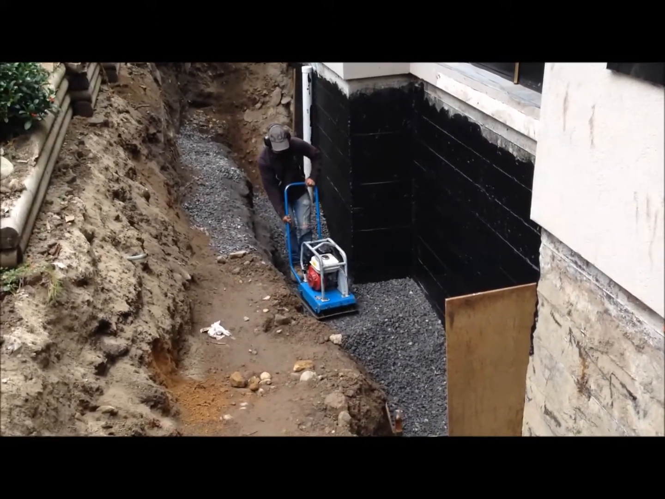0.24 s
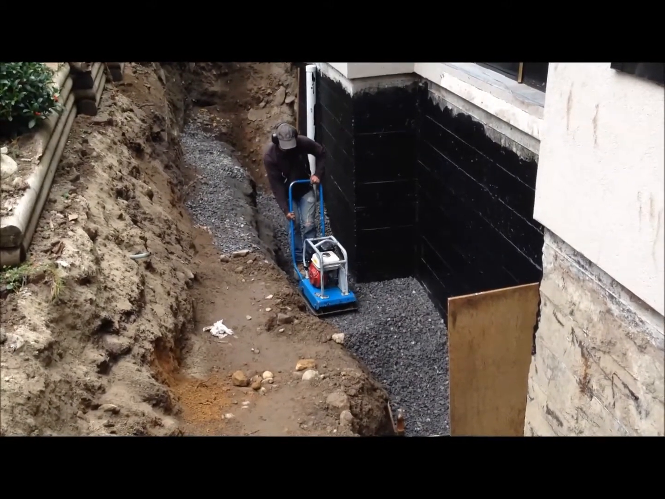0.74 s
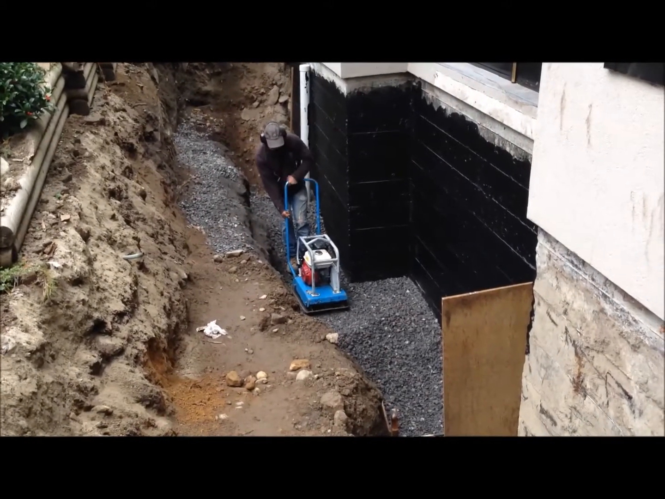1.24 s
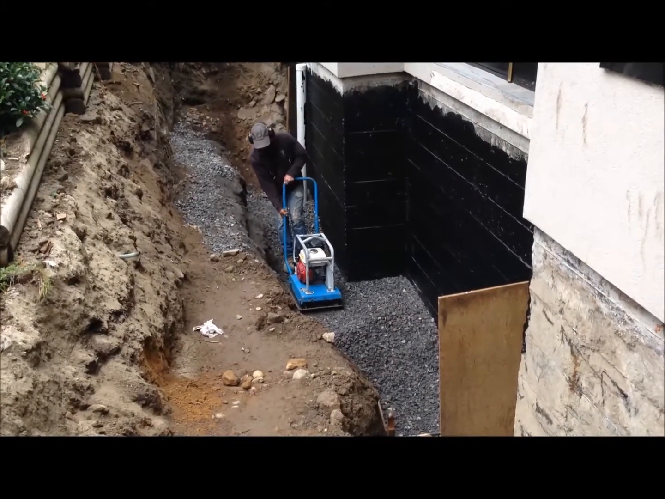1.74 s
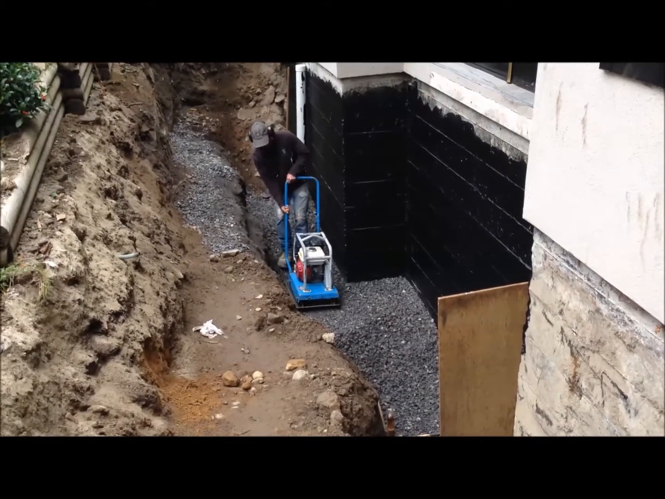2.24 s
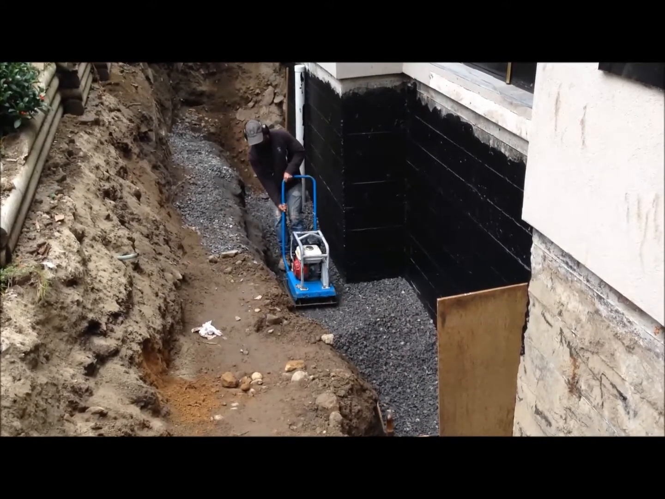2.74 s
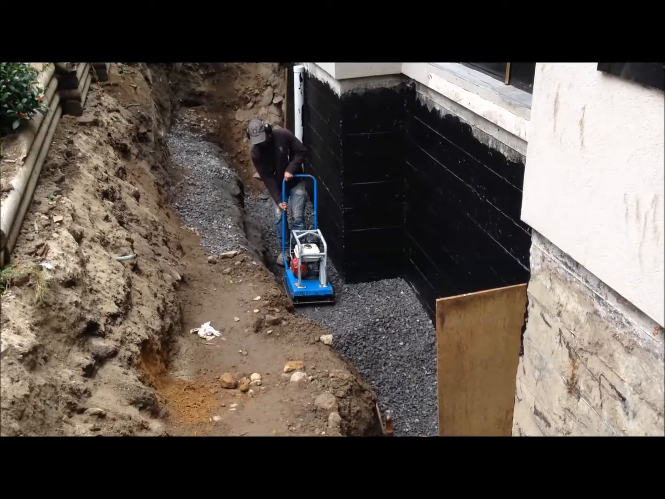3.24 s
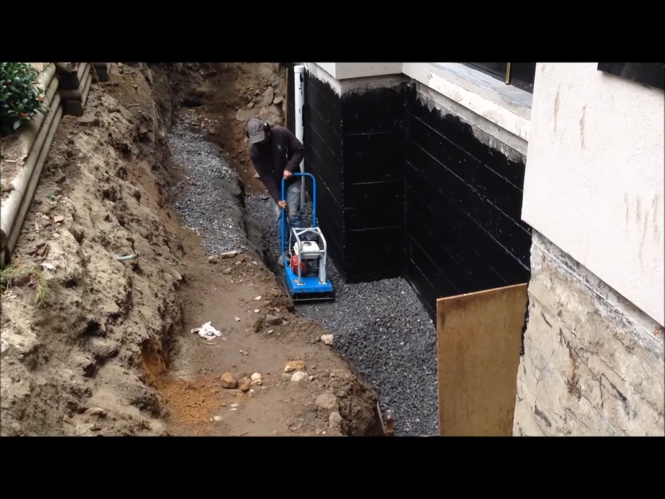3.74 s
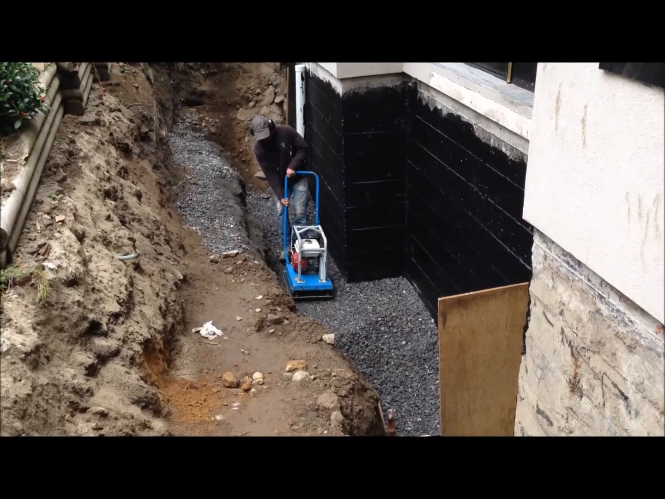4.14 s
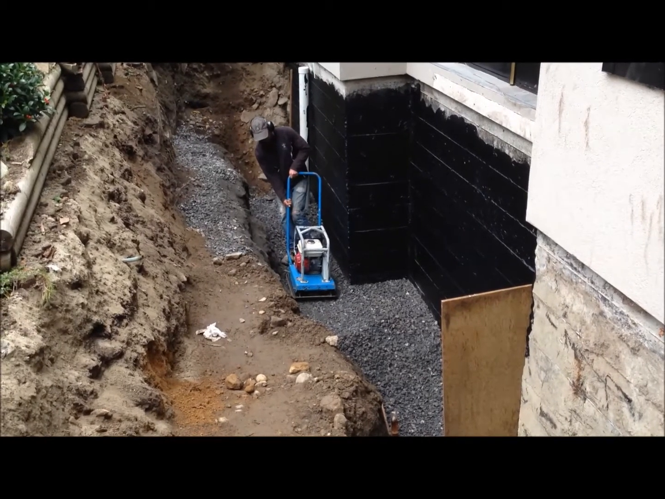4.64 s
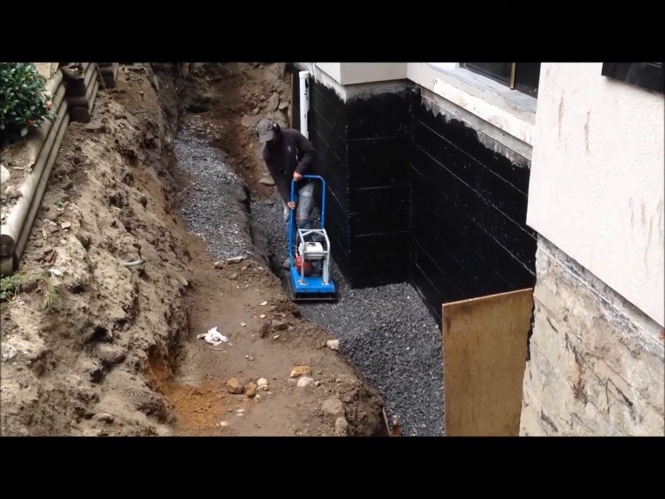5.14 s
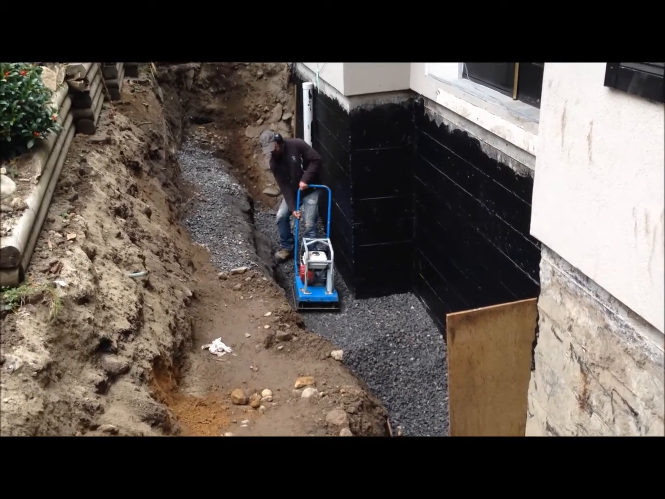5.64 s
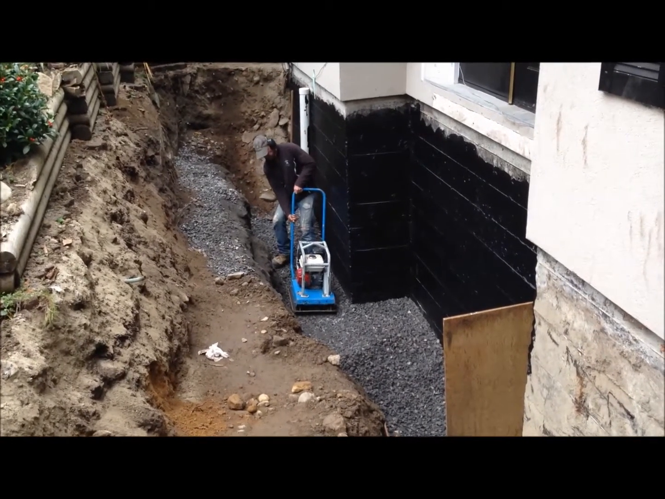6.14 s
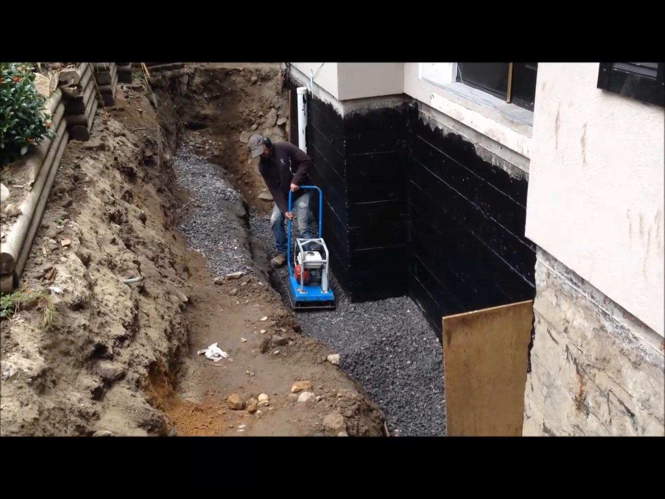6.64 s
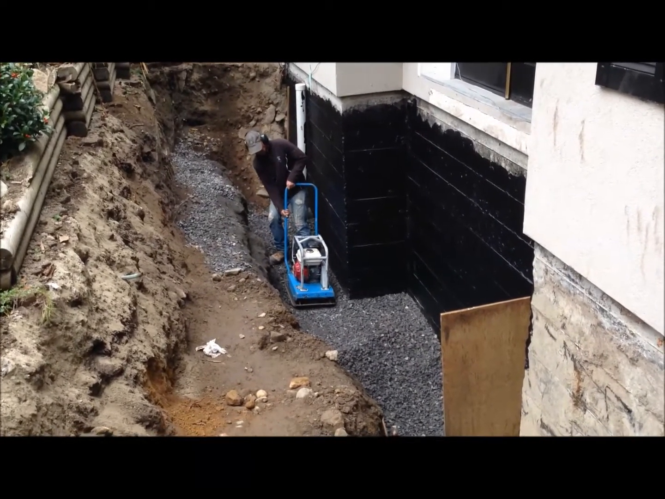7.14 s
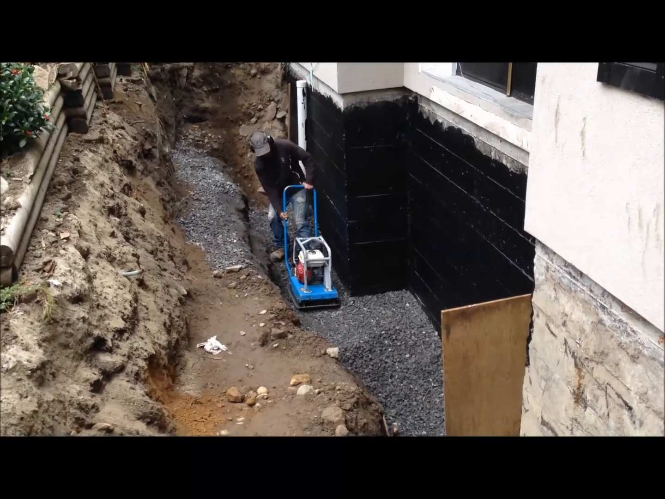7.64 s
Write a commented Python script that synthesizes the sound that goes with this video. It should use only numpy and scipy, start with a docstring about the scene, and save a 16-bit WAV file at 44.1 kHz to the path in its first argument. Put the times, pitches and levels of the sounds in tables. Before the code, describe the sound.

Loud low vibrating drone of a small-engined soil compactor in a trench, with uneven ground thumps, grinding stones and rattling steel parts.

```python
"""In a trench beside a house wall, a petrol plate compactor works crushed rock a few metres below the microphone.
Its one-cylinder four-stroke gives a harmonic exhaust note, knocks through a noisy block, and whines of fan and gears.
A belt spins the eccentric weight: a drone at its turn rate, swollen by random hard landings that thump the ground.
Bursts of filtered noise make the grinding stones; resonators ring the steel plate and the buzzing loose parts.
Short reflections off wall and earth follow the engine clatter and the stones."""
import sys
import numpy as np
from scipy import signal
from scipy.fft import rfft, irfft
from scipy.io import wavfile
from scipy.ndimage import uniform_filter1d, minimum_filter1d

SR = 44100
rng = np.random.default_rng(int(sys.argv[2]) if len(sys.argv) > 2 else 0)


def generate_wav(signal):
    """Clip the signal to [-1, 1] and save it as 16-bit WAV at the path in sys.argv[1]."""
    frames = np.transpose(np.atleast_2d(signal))
    scaled = np.clip(frames, -1, 1) * 32767
    pcm = np.round(scaled).astype(np.int16)
    wavfile.write(sys.argv[1], SR, pcm)


N = 347508
T = np.arange(N) / SR  # time of each sample, s

# Governed speed of the eccentric, sagging a little under load: time_s, turn_rate_hz
ECCENTRIC_SPEED = [(0.0, 110.2), (0.41, 110.7), (0.92, 109.2), (1.43, 109.9), (1.63, 109.9), (1.84, 110.8),
                   (2.14, 110.4), (2.35, 109.5), (3.57, 110.0), (4.9, 110.7), (5.2, 109.5), (5.82, 111.0),
                   (6.12, 111.0), (7.04, 109.9), (7.24, 110.1), (7.88, 109.5)]
# Rings of the loose parts, by part name: pitch_hz, width_hz, level_db between buzzes
LOOSE_PART_RINGS = {"handle": (1945, 28, -48.5), "frame": (2860, 38, -44), "guard": (3630, 57, -39),
                    "tank": (4763, 30, -44)}
# Exhaust note: multiple of the firing rate, level_db before the exhaust trim
EXHAUST_PARTIALS = [(1, -44), (2, -35.5), (3, -38), (4, -56), (5, -30.5), (6, -37), (7, -54), (8, -58.5),
                    (9, -40), (10, -51), (11, -38), (12, -43.5), (13, -50.5), (15, -43.5), (16, -51.5),
                    (17, -49), (18, -48.5), (20, -48.5), (21, -43.5), (23, -45)]
# Whines of the fan and of the timing gears: multiple of the firing rate, relative_level_db
FAN_PARTIALS = [(32, 2), (33, 0), (34, 3.5)]
GEAR_PARTIALS = [(38, 2.5), (40, 0), (43, 0), (62, -9.5), (66, -7)]
# Weak overtones of the plate: multiple of its turn rate, level_db relative to the drone
PLATE_OVERTONES = [(.5, -24), (1.5, -23), (3, -32), (4, -36.5), (5, -36.5), (6, -51.5)]
# Knocks of piston and valves: share of the engine cycle, relative_level_db
ENGINE_KNOCKS = [(0, -13.5), (.14, -7.5), (.42, -12), (.62, -9.5), (.78, -15)]
# Ringing of the steel plate: pitch_hz, width_hz, relative_level_db
STEEL_MODES = [(1030, 66, -6), (1374, 42, -5.5), (2087, 28, 4.5), (2648, 22, 5), (2923, 38, 0),
               (3190, 35, -2.5), (4180, 230, -7.5), (4470, 110, -6.5), (5430, 35, -4.5), (6270, 150, -8.5),
               (8240, 41, -12)]

# Colours of the ground thump, plate body, engine block, scraping stones and grit: frequency_hz, gain_db
THUMP_COLOUR = [(12, -10), (24, -14), (36, 6), (48, -5), (80, 2.5), (105, -2), (130, -1), (150, -8.5),
                (200, -14), (400, -43.5)]
BODY_COLOUR = [(120, -14.5), (170, -2.5), (200, 1), (255, 5), (300, 1.5), (410, -12), (490, 1.5),
               (560, -4.5), (630, -10), (710, -4.5), (900, -11), (2000, -31.5)]
BLOCK_COLOUR = [(300, -16.5), (600, 5), (880, -18.5), (1050, 6.5), (1400, 5.5), (1650, 0), (2400, 0.5),
                (4000, -7.5), (7000, -5), (15000, -30)]
SCRAPE_COLOUR = [(500, -13), (1100, 1), (1700, 0), (2600, 1), (3350, -3.5), (4300, -5), (5500, -7),
                 (8000, -17), (15000, -26)]
GRIT_COLOUR = [(1500, -7.5), (3500, 1), (5000, 1), (6800, 1), (8300, -2.5), (10000, -4), (12500, -11),
               (15200, -16.5)]

# The plate settles and stops bouncing for a moment: start_s, length_s, bounce_change_db
SETTLING_SPELLS = [(0.68, 0.11, -7), (1.04, 0.12, -3), (1.35, 0.45, -2), (2.19, 0.54, -7.5),
                   (2.69, 0.43, -3.5), (3.12, 0.25, -10), (3.56, 0.13, -7), (5.08, 0.11, -10),
                   (5.33, 0.12, -7), (6.88, 0.19, -11), (7.55, 0.11, -8)]
# The plate lies flat and slaps at twice its turn rate: start_s, length_s, slap_rise_db
FLAT_PLATE_SPELLS = [(0.12, 0.69, 12), (1.68, 0.68, 10.5), (3.05, 0.85, 6), (4.5, 0.56, 4.5),
                     (6.15, 0.71, 4)]
# The rocking catches the mode of the base: start_s, length_s, ring_rise_db
BASE_RING_SPELLS = [(2.3, 1.25, 5), (4.0, 1.044, 4), (4.3, 0.2, 7), (5.38, 0.13, 9), (5.95, 0.44, 8)]
# A loose part starts to buzz: start_s, length_s, part name, rise_db
PART_BUZZES = [(0.136, 0.93, "handle", 13.5), (0.445, 0.5, "frame", 1), (1.388, 0.15, "handle", 11),
               (1.68, 0.27, "frame", 11), (1.8, 0.33, "guard", 6.5), (2.6, 2.6, "tank", 5),
               (2.8, 1.0, "frame", 5), (2.85, 0.78, "handle", 8.5), (5.4, 0.56, "frame", 6),
               (5.95, 0.64, "guard", 5), (7.15, 0.6, "guard", 3.5)]
# The whines of fan and gears swell: start_s, length_s, rise_db
FAN_WHINE_SWELLS = [(3.72, 0.75, 4.3), (4.5, 0.8, 1.5), (6.47, 0.8, 6)]
GEAR_WHINE_SWELLS = [(0.0, 0.2, 4), (1.2, 1.26, 2.5), (2.8, 0.9, 3.5)]
# Ramp length of these spells, s
SETTLE_EDGE_S, FLAT_EDGE_S, BASE_EDGE_S, BUZZ_EDGE_S, WHINE_EDGE_S = 0.098, 0.21, 0.12, 0.098, 0.13

BELT = 3.511  # turns of the eccentric to one firing
TOP_HZ = 15100  # top of the recorder's range
# Levels at the start, before any spell; drone and grit grow as the bed of stones firms up
DRONE_DB, BOUNCE_DB, SLAP_DB, BASE_DB = -11.5, -23, -38, -39
RATTLE_DB, GRIT_DB, STEEL_WAVER_DB = -25.5, -29.0, 2.0
DRONE_DB_PER_S, GRIT_DB_PER_S = 0.31, 0.4258
DRONE_PER_BOUNCE = 0.19  # dB of drone for each dB of bouncing
# On a firmer bed the plate rocks more, and less while it lies flat (dB for each dB of slap)
ROCK_DB, ROCK_DB_PER_S, ROCK_PER_SLAP = -33.5, 0.27, -0.18
# The engine's exhaust, clatter and fan slowly recede
EXHAUST_DB, EXHAUST_DB_PER_S = 0.5, -0.12
CLATTER_DB, CLATTER_DB_PER_S = -29.6, -0.35
FAN_DB, FAN_DB_PER_S, GEAR_DB = -35.5, -0.84, -35.0


def undb(db):
    """Decibels to gain."""
    return 10 ** (np.asarray(db) / 20)


def level(x, db):
    """Bring the rms to 0 dB, then apply a fixed level or a level curve in dB."""
    return x * undb(db) / np.sqrt(np.mean(x ** 2))


def curves(table):
    """Interpolate a (time_s, value) table to one value a sample."""
    return np.interp(T, *np.transpose(table))


def spells(rows, edge_s):
    """Level change in dB from (start, length, dB) spells, each ramping in, holding and ramping out."""
    total_db = 0
    for start, length, db in rows:
        inside_s = np.minimum(T - start, start + length - T)
        total_db = total_db + db * np.clip(inside_s / edge_s + .5, 0, 1)
    return total_db


def walk(rate):
    """Smooth random drift with a spread near 1, from random steps at this rate in Hz."""
    k = int(SR / rate)
    steps = np.repeat(rng.standard_normal(N // k + 1), k)
    return 1.5 * uniform_filter1d(uniform_filter1d(steps, k), k)[:N]


def colour(x, points, size=8192):
    """Causal, minimum-phase filter through (Hz, dB) points."""
    hz, db = np.transpose(points)
    f = np.maximum(np.arange(size // 2 + 1) * SR / size, 1)
    gain_db = np.interp(np.log(f), np.log(hz), db)
    # fold the cepstrum forward in time so that the response never precedes its cause
    cepstrum = irfft(np.log(undb(gain_db)))
    cepstrum[1:size // 2] *= 2
    cepstrum[size // 2 + 1:] = 0
    response = irfft(np.exp(rfft(cepstrum)))
    return signal.fftconvolve(x, response)[:N]


def ring(x, modes):
    """A bank of (Hz, width, dB) resonances."""
    out = 0
    for hz, width, db in modes:
        b, a = signal.iirpeak(hz, hz / width, fs=SR)
        out = out + undb(db) * signal.lfilter(b, a, x)
    return out


def blows(phase, scatter_db):
    """One click of random size at each wrap of the phase."""
    at = np.flatnonzero(np.diff(np.floor(phase)) > 0)
    out = np.zeros(N)
    out[at] = undb(scatter_db * rng.standard_normal(len(at)))
    return out


def fade(x, seconds):
    """Give each click an exponential tail with this time constant."""
    return signal.lfilter([1], [1, -np.exp(-1 / (seconds * SR))], x)


def tone(phase, db, waver_db, slip, rate):
    """A partial that wavers in level and slips in phase (radians)."""
    waver = undb(waver_db * walk(rate))
    wave = np.sin(2 * np.pi * phase + slip * walk(rate))
    return level(waver * wave, db)


def trench(x, wet_db, t60):
    """Short scattered reflections off the house wall and the earth bank, as a decaying noise tail."""
    age = np.arange(SR // 2) / SR
    decay = np.exp(-np.log(1000) * age / t60)
    tail = rng.standard_normal(len(age)) * decay * (age > .005)
    reflections = signal.fftconvolve(x, tail / np.linalg.norm(tail))[:N]
    return x + undb(wet_db) * reflections


def loose_parts(turn):
    """Loose parts are jolted on every turn; each rings at its own pitch, louder while it buzzes."""
    out = 0
    for part, (hz, width, db) in LOOSE_PART_RINGS.items():
        rows = [(start, length, rise) for start, length, name, rise in PART_BUZZES if name == part]
        buzz_db = spells(rows, BUZZ_EDGE_S)
        jolts = fade(blows(turn, scatter_db=1.5), seconds=0.0019) * rng.standard_normal(N)
        out = out + level(ring(jolts, [(hz, width, 0)]), db + buzz_db)
    return out


def whine(cycle, orders):
    """Rough lines on the engine speed; each swells and fades as the machine moves between the walls."""
    out = 0
    for k, db in orders:
        rough_phase = round(k) * cycle + 0.056 * walk(24)
        out = out + tone(rough_phase, db, waver_db=1.5, slip=0.7, rate=6)
    return out


def exhaust(cycle):
    """Pressure pulses of the firing, as wavering harmonics of the firing rate."""
    note = sum(tone(round(k) * cycle, db, waver_db=1.76, slip=0.31, rate=8) for k, db in EXHAUST_PARTIALS)
    return undb(EXHAUST_DB + EXHAUST_DB_PER_S * T) * note


def engine_clatter(cycle):
    """Piston and valves knock in each four-stroke cycle, exciting the block and its tin covers."""
    knocks = sum(undb(db) * blows(cycle - share, scatter_db=2.5) for share, db in ENGINE_KNOCKS)
    # the block answers every knock alike; the covers add a rattle that never repeats
    age = np.arange(2048) / SR
    answer = rng.standard_normal(len(age)) * np.exp(-age / 0.0062)
    block = level(signal.fftconvolve(knocks, answer)[:N], -5.5)
    covers = level(fade(knocks, seconds=0.0043) * rng.standard_normal(N), 0)
    clatter = trench(colour(block + covers, BLOCK_COLOUR), wet_db=-3.5, t60=0.12)
    return level(clatter, CLATTER_DB + CLATTER_DB_PER_S * T)


def engine(cycle, fan_db, gear_db):
    """Exhaust, fan, gears and knocks all follow one four-stroke cycle."""
    fan = level(whine(cycle, FAN_PARTIALS), fan_db)
    gears = level(whine(cycle, GEAR_PARTIALS), gear_db)
    return exhaust(cycle) + fan + gears + engine_clatter(cycle)


def stones(turn, rattle_db, grit_db):
    """Stones crack and scrape under each landing and set the steel ringing."""
    # about a dozen times a second a stone bursts, and its crumbs grind on for a moment
    breaking = np.cumsum(12 * undb(3 * walk(20))) / SR
    crumbs = 1 + .7 * np.tanh(fade(blows(breaking, scatter_db=3), seconds=.022))
    # the pressure peaks on each turn, and alternate turns press harder
    landing_db = 0.66 * np.cos(2 * np.pi * turn) + 1.0 * np.cos(np.pi * turn)
    press = undb(landing_db) * crumbs
    cracks = rng.standard_normal(N) * undb(2.0 * np.minimum(rng.exponential(size=N), 6))
    grit = level(colour(cracks * press, GRIT_COLOUR), grit_db)
    rubbing = rng.standard_normal(N) * np.sqrt(press)
    scrape = level(colour(rubbing, SCRAPE_COLOUR), rattle_db - 3.5)
    # each mode of the steel swells and fades as the stones touch different spots
    strikes = cracks * np.sqrt(crumbs)
    ringing = sum(undb(STEEL_WAVER_DB * walk(3)) * ring(strikes, [mode]) for mode in STEEL_MODES)
    return grit + scrape + level(ringing, rattle_db - 8.8)


def rock(turn, rock_db, ring_db):
    """Half-order tones of the rocking plate; the upper one meets a mode of the base."""
    rocking = tone(2.5 * turn, rock_db, waver_db=1.0, slip=0.95, rate=14)
    base = tone(4.5 * turn, ring_db, waver_db=2.0, slip=1.0, rate=18)
    return rocking + base


def plate(turn, drone_db, bounce_db, slap_db):
    """The eccentric makes the plate drone at its turn rate, kicked up by its hard landings."""
    # the engine's shaking, at three times the firing rate, beats against the eccentric
    beat = turn - 3 * turn / BELT
    # the plate tends to land hard at the top of each beat
    hardness = rng.standard_normal(N) + 0.48 * np.cos(2 * np.pi * beat) - .2
    hardness = np.clip(hardness, 0, 1.3)
    # it meets the ground part of the way through each turn
    kicks = blows(turn - .7, scatter_db=-1.5) * (hardness - np.mean(hardness))
    # a hard landing swells the drone for a couple of turns and thumps the ground
    swell = uniform_filter1d(uniform_filter1d(kicks, size=600), size=500)
    surge = level(swell, bounce_db - drone_db - 0.7)
    drone = (1 + surge) * tone(turn, drone_db, waver_db=0.12, slip=0.045, rate=24)
    thump = -level(colour(kicks, THUMP_COLOUR), bounce_db)
    overtones = sum(tone(round(2 * k) / 2 * turn, drone_db + db, waver_db=1.5, slip=0.99, rate=10)
                    for k, db in PLATE_OVERTONES)
    slap = tone(2 * turn, slap_db, waver_db=0.6, slip=0.092, rate=9.6)
    # the base rumbles on from one landing to the next
    rumble = fade(blows(turn, scatter_db=2.5), seconds=0.0069) * rng.standard_normal(N)
    body = level(colour(rumble, BODY_COLOUR), -28.0)
    return drone + overtones + slap + thump + body


def scene():
    """The belt locks eccentric to engine; how the plate sits on the stones sets its levels."""
    turn = np.cumsum(curves(ECCENTRIC_SPEED)) / SR
    settled_db = spells(SETTLING_SPELLS, SETTLE_EDGE_S)
    flat_db = spells(FLAT_PLATE_SPELLS, FLAT_EDGE_S)

    fan_db = FAN_DB + FAN_DB_PER_S * T + spells(FAN_WHINE_SWELLS, WHINE_EDGE_S)
    gear_db = GEAR_DB + spells(GEAR_WHINE_SWELLS, WHINE_EDGE_S)
    motor = engine(turn / BELT, fan_db, gear_db)

    grit_db = GRIT_DB + GRIT_DB_PER_S * T
    crunch = trench(stones(turn, RATTLE_DB, grit_db), wet_db=-10.5, t60=0.1)

    rock_db = ROCK_DB + ROCK_DB_PER_S * T + ROCK_PER_SLAP * flat_db
    base_db = BASE_DB + spells(BASE_RING_SPELLS, BASE_EDGE_S)
    rocking = rock(turn, rock_db, base_db)

    drone_db = DRONE_DB + DRONE_DB_PER_S * T + DRONE_PER_BOUNCE * settled_db
    drone = plate(turn, drone_db, BOUNCE_DB + settled_db, SLAP_DB + flat_db)
    return (loose_parts(turn) + motor + crunch + rocking + drone)[None]


def record(dry):
    """A look-ahead limiter rounds off the hardest thumps; the recorder cuts the top."""
    need = np.minimum(1, .9 / (np.abs(dry) + 1e-9))
    gain = uniform_filter1d(minimum_filter1d(need, size=601), size=601)
    top_cut = signal.ellip(10, .2, 80, TOP_HZ, fs=SR, output="sos")
    return signal.sosfilt(top_cut, dry * gain)


dry = scene()
out = record(dry)
generate_wav(out)
```